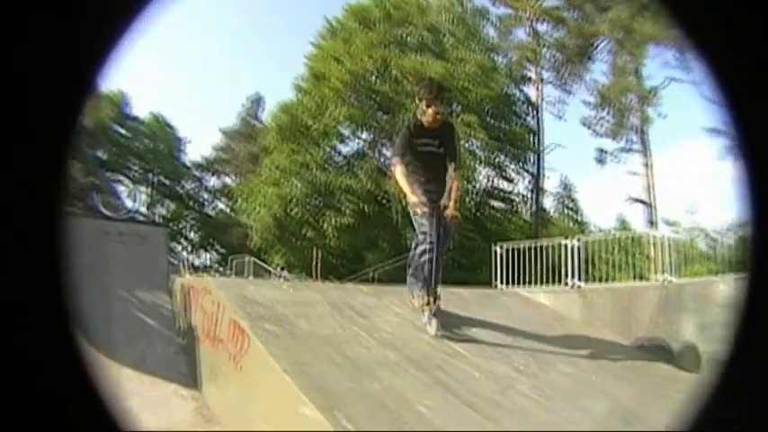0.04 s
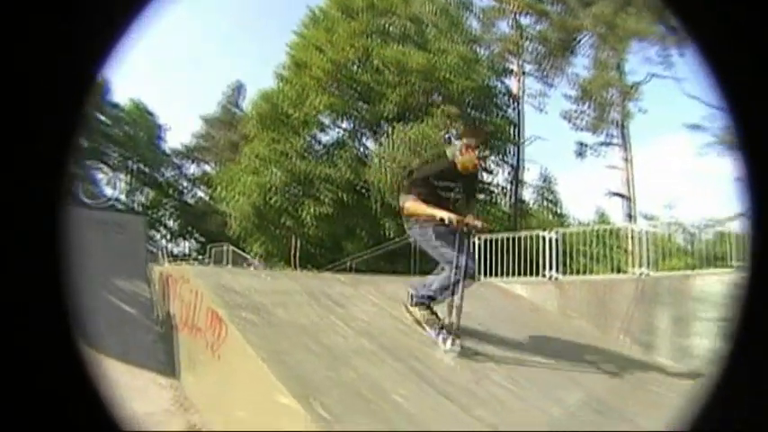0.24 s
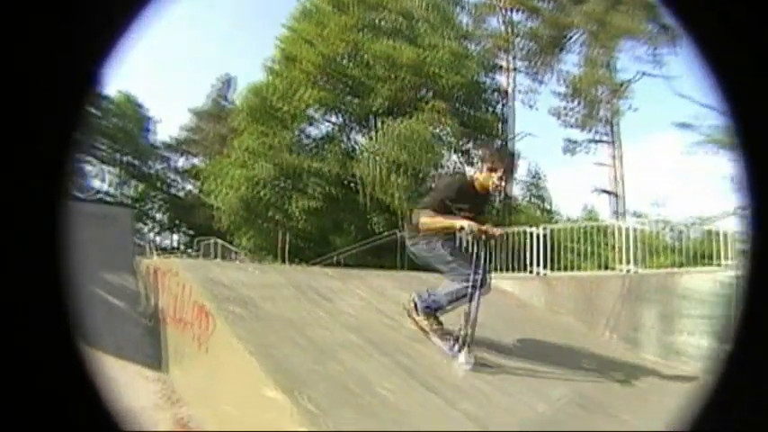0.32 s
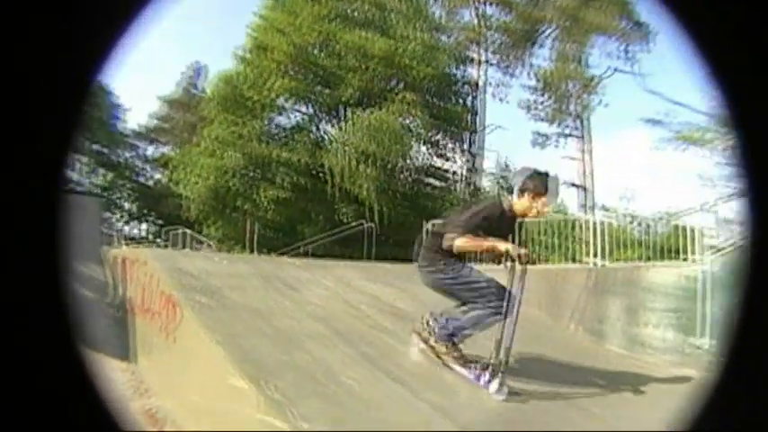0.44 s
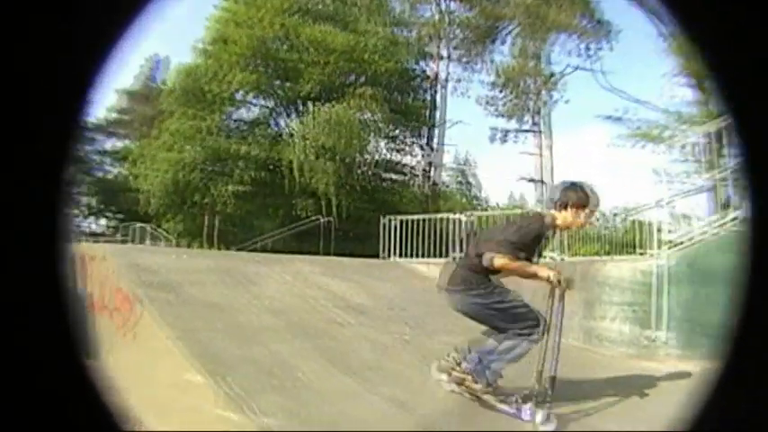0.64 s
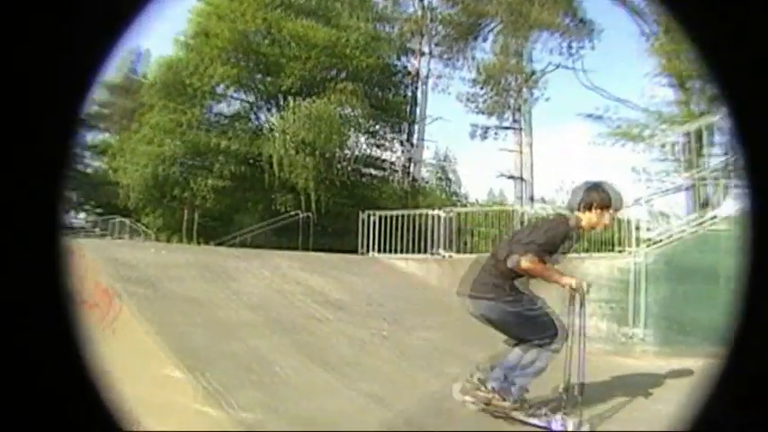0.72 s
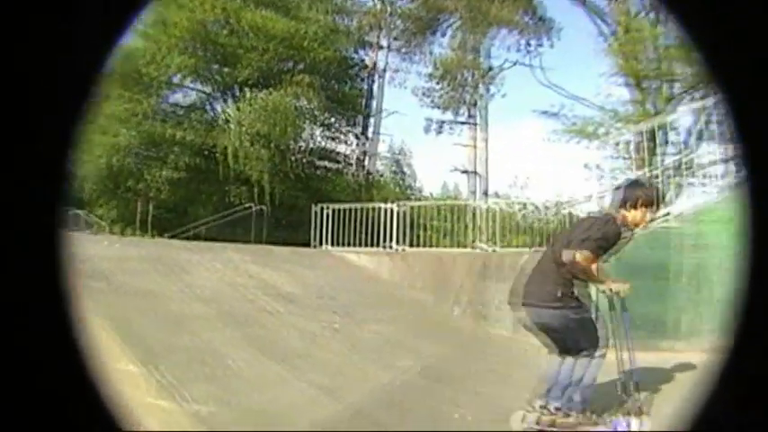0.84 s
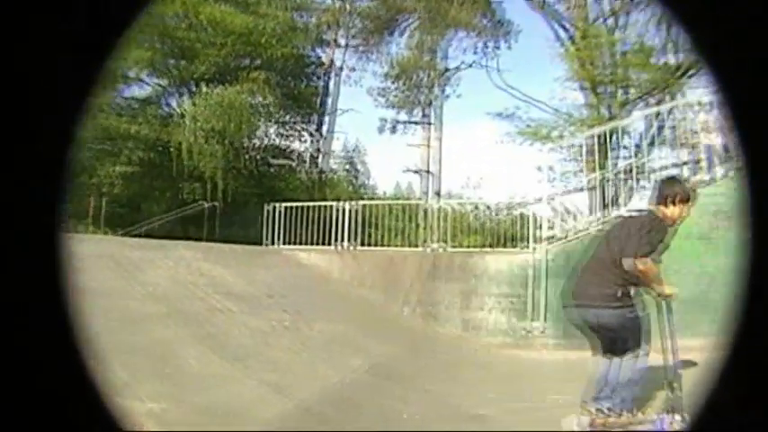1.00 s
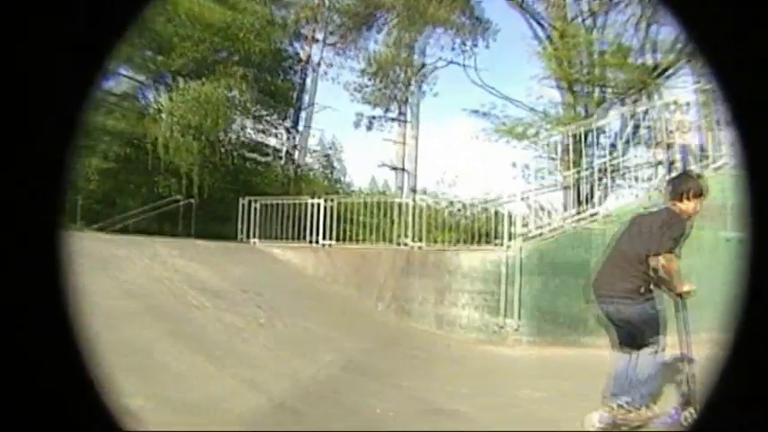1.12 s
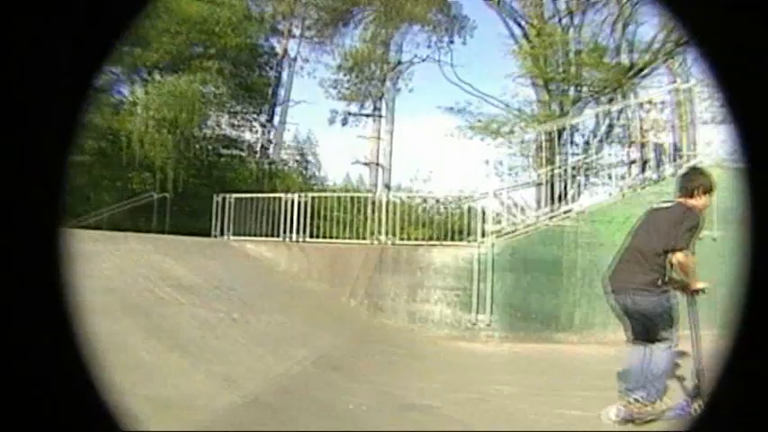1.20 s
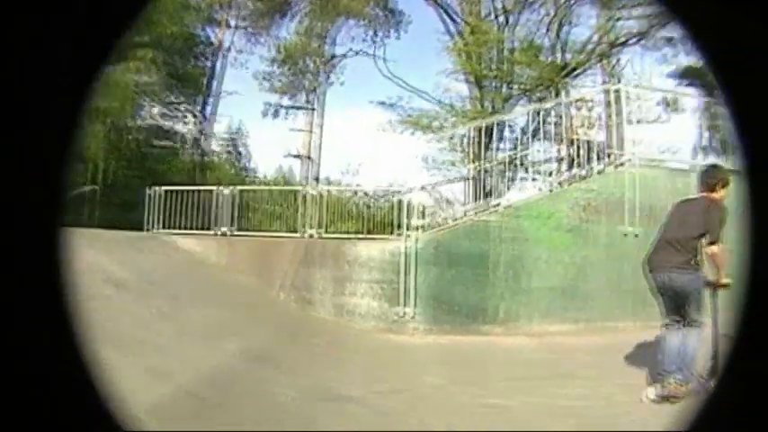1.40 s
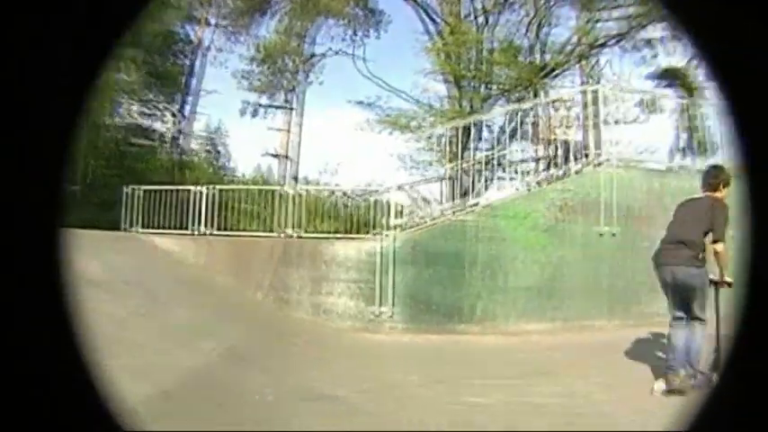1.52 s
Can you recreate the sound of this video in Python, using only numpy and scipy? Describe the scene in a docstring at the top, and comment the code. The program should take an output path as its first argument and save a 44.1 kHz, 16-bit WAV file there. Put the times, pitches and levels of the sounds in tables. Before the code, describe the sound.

In an open-air skatepark, a scooter thumps and clacks down hard, briefly distorting the microphone. It rolls away over grainy concrete with a low rumble, the wheels rasping through a turn while the frame rattles lightly.

```python
"""Kick scooter landing in a skatepark

A scooter drops onto an open-air concrete ramp and rolls away. The wheels slam down and overload
the microphone; deck and rider settle in a run of duller thuds. Then the wheels roar over grainy
concrete, rumble over its bumps and rasp through the turn, while the loaded deck drones and the
frame shakes out a few rattles."""
import sys
import numpy as np
from scipy import signal
from scipy.fft import rfft, irfft, next_fast_len
from scipy.io import wavfile
from scipy.ndimage import uniform_filter1d

SR = 44100
rng = np.random.default_rng(int(sys.argv[2]) if len(sys.argv) > 2 else 0)


def generate_wav(sig):
    """Save sig (samples, or channels by samples) to the path in sys.argv[1] as 16-bit PCM at SR."""
    pcm = np.round(np.clip(np.atleast_2d(sig).T, -1, 1) * 32767).astype(np.int16)
    wavfile.write(sys.argv[1], SR, pcm)


N = 68355
TIME = np.arange(N) / SR

# The open-air bed. Each row: pitch in Hz, relative level in dB.
AIR_SPECTRUM = [(25, -13), (60, 4.5), (150, -3.5), (380, -1), (900, -3), (2200, -25), (4500, -21.5),
                (7500, -31), (16000, -42)]
# Far scuffs and knocks during the jump.
# Each row: start in seconds, level in dB, centre in Hz, attack in seconds, t60 in seconds.
FAR_SCUFFS = [(.044, -33, 1450, 0.0069, 0.15), (0.045, -41, 2830, 0.0087, 0.18),
              (.089, -32.5, 380, 0.005, .09), (.095, -45, 1850, 0.026, 0.38), (.133, -42, 76, 0.005, 0.17)]
# A scuff's colour. Each row: multiple of its centre, relative level in dB.
SCUFF_SPECTRUM = [(.1, -18), (.5, -3.5), (1, 11), (2, -6.5), (6, -36)]

# The landing, hit by hit. Each row: start in seconds, thud in dB, brightness in Hz, clack in dB.
LANDING_HITS = [(0.2353, -13, 900, -25), (.2377, 8.5, 700, -14.5), (0.2411, -4, 900, -41),
                (0.2469, -8.5, 900, -12.5), (0.26, -12.5, 990, -24.5), (0.2676, -7, 2210, -19),
                (.272, -11.5, 1300, -19.5), (0.28, -2, 2550, -18.5), (0.288, -23, 1200, -26),
                (0.295, -1, 219, -31), (.3025, -5.5, 635, -29), (0.3121, 1, 182, -40),
                (.322, -11.5, 700, -25), (.355, -11, 214, -40), (.378, -19, 242, -37),
                (0.404, -23, 200, -52), (0.436, -15, 104, -46)]
# Deck and rider on the ramp; the short modes are the smack.
# Each row: pitch in Hz, level in dB, t60 in seconds.
DECK_MODES = [(109, -19.5, 0.19), (153, -27, 0.098), (228, -9.5, .12), (256.4, -5, 0.048),
              (345.4, -9.5, 0.062), (440, -17, 0.051), (572, -16.5, 0.014), (700, -12, 0.053),
              (824, -24.5, 0.068), (900, -17, 0.011), (1000, -48, 0.051), (1450, -33, 0.049)]
# The metal clack. Each row: pitch in Hz, relative level in dB.
CLACK_SPECTRUM = [(500, 7.5), (900, 7), (2000, -10), (3000, -12.5), (4300, -12), (7000, -25), (11000, -29),
                  (16000, -30)]
# Scatter off the ramps. Each row: pitch in Hz, relative level in dB.
TAIL_SPECTRUM = [(30, -12), (60, -1.5), (100, 6), (230, -0.5), (400, -5.5), (750, -9.5), (1500, -55),
                 (4000, -55)]

# The roar's fader: speed, load and nearness in one. Each row: time in seconds, level in dB.
ROLL_LEVEL = [(.23, -76), (.26, -60), (.4, -43), (.5, -42.5), (.58, -35.5), (.635, -30.5), (.72, -30),
              (.84, -30), (1.0, -32.5), (1.12, -34), (1.28, -34.5), (1.42, -34.5), (1.55, -37.5)]
# Wheel roar, grit and low rumble. Each row: pitch in Hz, relative level in dB.
ROAR_SPECTRUM = [(150, -6.5), (300, 3.5), (600, -3), (900, 0), (1350, 0.5), (2000, -14), (3100, -17),
                 (4400, -19), (7000, -31.5), (10000, -40), (16000, -40)]
GRIT_SPECTRUM = [(1000, -4), (2000, -23), (4300, -12), (7000, -7), (16000, -9)]
RUMBLE_SPECTRUM = [(20, -32), (40, 1.5), (65, 8.5), (100, 10), (135, 2.5), (220, -4.5), (500, -60)]
# Swells in the concrete. Each row: peak time in seconds, rumble in dB, half length in seconds.
CONCRETE_BUMPS = [(.65, -30.5, 0.047), (.86, -25.5, 0.028), (0.966, -28, 0.026), (1.05, -33, 0.034),
                  (1.174, -27, 0.016), (1.25, -31, 0.028), (1.41, -33, 0.047), (1.536, -31, .035)]
# Load on the deck, heard as its drone. Each row: time in seconds, level in dB.
DRONE_LEVEL = [(.24, -77), (.5, -45), (.65, -33.5), (.76, -37.5), (.86, -30), (1.0, -30.5), (1.12, -36),
               (1.3, -31), (1.42, -31), (1.55, -31.5)]
# The deck's resonances. Each row: pitch in Hz, nominal width in Hz, relative level in dB.
DRONE_BANDS = [(213, 40, -4.5), (287, 58, -6), (377.5, 56, -2), (606, 43.5, -5), (1068, 71, -14.5),
               (1280, 68, -41)]
# The hum follows wheel speed. Each row: time in seconds, pitch in Hz, level in dB.
HUM_CURVE = [(.6, 330.3, -71), (.77, 355, -40), (.87, 395, -45), (1.0, 398, -30.5), (1.1, 344, -37.5),
             (1.2, 350, -43.5), (1.55, 345.4, -41)]

# Loose parts shaking. Each row: start in seconds, level in dB, strongest pitch in Hz.
RATTLE_HITS = [(0.623, -45, 4000), (.695, -40, 5000), (.824, -31, 2400), (.898, -37.5, 4400),
               (1.102, -39, 2000), (1.1874, -34, 4800), (1.352, -38, 2550), (1.4586, -27.5, 3970),
               (1.484, -36, 2580)]
# A rattle's colour. Each row: multiple of its strongest pitch, relative level in dB.
RATTLE_SPECTRUM = [(.2, -13), (.5, 3.5), (1, 4.5), (1.25, 1.5), (1.8, -15), (4, -23)]
# The frame's ring. Each row: pitch in Hz, level in dB, t60 in seconds.
FRAME_MODES = [(2146, -1.5, 0.038), (2825, -4, 0.049), (3160, -16, .03), (4260, -4, 0.025),
               (4470, -9, 0.03), (5750, -17, 0.024)]
# The scrub's fader. Each row: time in seconds, level in dB.
SCRUB_LEVEL = [(.7, -47.5), (.8, -39), (.84, -37.5), (.92, -42), (1.0, -38), (1.06, -47), (1.12, -41.5),
               (1.2, -53)]
# The scrub's rasp. Each row: pitch in Hz, nominal width in Hz, relative level in dB.
RASP_BANDS = [(1740, 370, 8.5), (2340, 280, 1.5), (2800, 410, -1), (3470, 550, -3), (4280, 540, -6)]

# Stereo width of the noises. Each row: pitch in Hz, left-right likeness (1 is mono).
STEREO_LIKENESS = [(60, 1), (400, 0.91), (1000, 1), (2500, 0.75), (4300, 0.28), (6000, 0.45), (9000, 0.74),
                   (15000, .8)]
# Balance of the whole mix, on top of the pans. Each row: pitch in Hz, left over right in dB.
STEREO_BALANCE = [(60, 1.3), (110, -1.2), (380, -3.5), (1200, -2.5), (2400, 0), (4400, -2), (8000, -1),
                  (15000, -0.5)]


def from_db(db):
    """Decibels to gain."""
    return 10 ** (np.asarray(db) / 20)


def rms_one(x):
    """Scale to unit power."""
    return x / np.sqrt(np.mean(x ** 2) + 1e-20)


def in_time(rows):
    """Each column of a curve at every sample."""
    times, *columns = np.transpose(rows)
    return [np.interp(TIME, times, column) for column in columns]


def at_hz(points, hz):
    """Read a spectrum on a log-frequency axis."""
    pitches, values = np.transpose(points)
    return np.interp(np.log(hz + 1e-9), np.log(pitches), values)


def pan(db):
    """Channel gains that put left this many dB over right."""
    return from_db(np.array([[db], [-db]]) / 2)


def drift(rate_hz):
    """A smooth random wander with a spread of 1."""
    step, run_in = 40, 2000
    pole = np.exp(-2 * np.pi * rate_hz * step / SR)
    white = rng.standard_normal(N // step + run_in + 2)
    slow = signal.lfilter([1], [1, -2 * pole, pole * pole], white)[run_in:]
    return np.interp(np.arange(N) / step, np.arange(len(slow)), rms_one(slow))


def colour(pair, spectrum):
    """Two unrelated signals become mid and side of a sound with this spectrum; rms 1."""
    size = 2 * next_fast_len(N // 2 + 1)
    hz = np.arange(size // 2 + 1) * SR / size
    mid, side = rfft(pair, size) * from_db(at_hz(spectrum, hz))
    alike = at_hz(STEREO_LIKENESS, hz)
    mid, side = mid * np.sqrt(1 + alike), side * np.sqrt(1 - alike)
    return rms_one(irfft(np.array([mid + side, mid - side]))[:, :N])


def noise(spectrum):
    """Stereo noise with this spectrum."""
    return colour(rng.standard_normal((2, N)), spectrum)


def noise_around(hz, shape):
    """Stereo noise with its spectrum placed around this pitch."""
    return noise([(hz * multiple, db) for multiple, db in shape])


def resonant_noise(bands):
    """Noise rings a set of resonances; rms 1."""
    total = np.zeros(N)
    for hz, width, db in bands:
        band = rng.standard_normal(N)
        for _ in range(2):  # two wide passes give steep skirts
            band = signal.lfilter(*signal.iirpeak(hz, hz / (2 * width), fs=SR), band)
        total += from_db(db) * rms_one(band)
    return rms_one(total)


def burst(start, attack, t60):
    """A straight rise, then a decay of 60 dB per t60; all in seconds."""
    age = TIME - start
    return np.clip(age / attack, 0, 1) * from_db(-60 * np.maximum(age - attack, 0) / t60)


def click(start):
    """A unit impulse."""
    return 1.0 * (np.arange(N) == int(start * SR))


def ring(force, modes):
    """A force sets each mode ringing as a dying sine."""
    total = np.zeros(N)
    for hz, db, t60 in modes:
        pole, angle = np.exp(-np.log(1000) / (t60 * SR)), 2 * np.pi * hz / SR
        feedback = [1, -2 * pole * np.cos(angle), pole * pole]
        total += from_db(db) * signal.lfilter([0, np.sin(angle)], feedback, force + 1e-18)
    return total


def park(air_db=-46):
    """A quiet bed of open air with a few far scuffs."""
    scuffs = sum(from_db(db) * burst(start, attack, t60) * noise_around(hz, SCUFF_SPECTRUM)
                 for start, db, hz, attack, t60 in FAR_SCUFFS)
    return from_db(air_db) * noise(AIR_SPECTRUM) + scuffs


def contact(start, brightness_hz, band_ratio=3.6):
    """One hit's force fills a band up to its brightness: hard hits are thin, soft ones deep."""
    high_cut = signal.butter(3, brightness_hz, fs=SR, output="sos")
    low_cut = signal.butter(1, brightness_hz / band_ratio, "high", fs=SR, output="sos")
    return signal.sosfilt(np.vstack([high_cut, low_cut]), click(start))


def landing(low_cut_hz=79, tail_db=-16.5):
    """Each hit thumps the deck and clacks the metal; the ramps scatter the main slam."""
    force = sum(from_db(db) * contact(start, hz) for start, db, hz, _ in LANDING_HITS)
    force = signal.sosfilt(signal.butter(1, low_cut_hz, "high", fs=SR, output="sos"), force)
    thud = ring(force, DECK_MODES)
    clack = noise(CLACK_SPECTRUM) * sum(from_db(db) * burst(start, attack=0.0006, t60=0.04)
                                        for start, _, _, db in LANDING_HITS)
    slam_s = LANDING_HITS[1][0]
    tail = from_db(tail_db) * noise(TAIL_SPECTRUM) * burst(slam_s, attack=0.0088, t60=0.79)
    return thud + clack + tail


def wheels(flutter_db=0.96):
    """Rough concrete roars under the wheels, with grit on top and rumble below."""
    effort = from_db(in_time(ROLL_LEVEL)[0])
    roar = noise(ROAR_SPECTRUM) * from_db(flutter_db * drift(rate_hz=35))
    return effort * (roar + grit()) + rumble(effort)


def grit(grains_per_s=1200, spread_db=5, level_db=-27):
    """Grains of random size crackle under the wheels."""
    sizes = from_db(spread_db * np.minimum(rng.exponential(1, N), 4))
    grains = (rng.random(N) < grains_per_s / SR) * sizes * rng.choice([-1, 1], (2, N))
    return from_db(level_db) * colour(grains, GRIT_SPECTRUM)


def rumble(effort, steady_db=-5, levelling_s=0.045):
    """The low end rides with the rolling effort and swells over each bump."""
    swells = sum(from_db(db) * np.exp(-0.5 * ((TIME - peak) / half_length) ** 2)
                 for peak, db, half_length in CONCRETE_BUMPS)
    low = noise(RUMBLE_SPECTRUM)
    power = uniform_filter1d(np.mean(low ** 2, axis=0), int(levelling_s * SR))
    levelled = low / np.sqrt(power + 1e-9)  # so the bumps shape it, not chance
    return levelled * np.hypot(swells, from_db(steady_db) * effort)


def deck_drone():
    """The ground shakes the loaded deck's resonances."""
    return from_db(in_time(DRONE_LEVEL)[0]) * resonant_noise(DRONE_BANDS)


def wheel_hum(waver_rate_hz=40, waver_db=4.5, pitch_spread=0.05):
    """The spinning wheels hum roughly, unsteady in pitch and level."""
    hz, db = in_time(HUM_CURVE)
    phase = 2 * np.pi * np.cumsum(hz * (1 + pitch_spread * drift(waver_rate_hz))) / SR
    waver = from_db(waver_db * drift(waver_rate_hz))
    return from_db(db) * rms_one(np.sin(phase) * waver)


def rattles(attack_s=0.0008, t60_s=0.042, frame_db=-1):
    """Loose parts chatter briefly and ring the frame."""
    chatter = sum(from_db(db) * burst(start, attack_s, t60_s) * noise_around(hz, RATTLE_SPECTRUM)
                  for start, db, hz in RATTLE_HITS)
    taps = sum(from_db(db + frame_db) * click(start + attack_s) for start, db, _ in RATTLE_HITS)
    return chatter + ring(taps, FRAME_MODES)


def scrub(rough_db=1.5):
    """The wheels rasp unevenly as they carve through the foot of the ramp."""
    level_db = in_time(SCRUB_LEVEL)[0] + rough_db * drift(rate_hz=51)
    return from_db(level_db) * resonant_noise(RASP_BANDS)


def scene():
    """Landing, ride and park; the mix leans a little right, most of all in the mids."""
    mix = pan(db=0.5) * landing()
    mix += pan(db=-0.46) * (wheels() + deck_drone() + wheel_hum() + scrub() + rattles())
    mix += pan(db=-2.5) * park()
    size = 2 * next_fast_len(N)
    balance_db = at_hz(STEREO_BALANCE, np.arange(size // 2 + 1) * SR / size)
    channel_gains = from_db(np.array([balance_db, -balance_db]) / 2)
    return irfft(rfft(mix, size) * channel_gains)[:, :N]


def record(dry, stopband_hz=16700):
    """The slam overloads the microphone and clips flat; a steep filter takes off the very top."""
    high_cut = signal.cheby2(16, 70, stopband_hz, fs=SR, output="sos")
    return signal.sosfilt(high_cut, np.clip(dry, -1, 1))


dry = scene()
out = record(dry)
generate_wav(out)
```